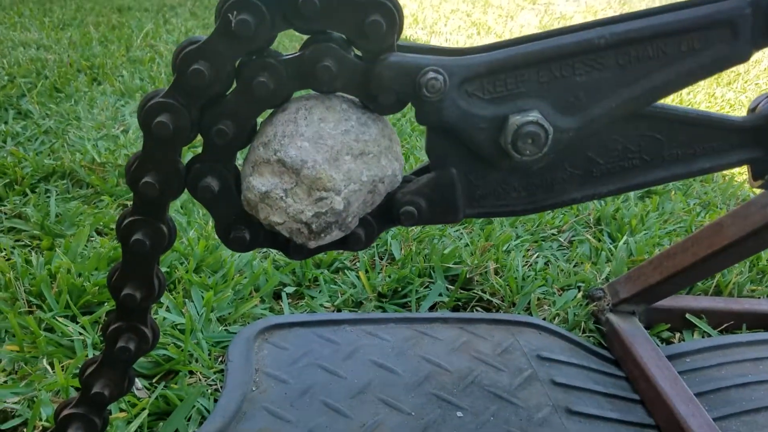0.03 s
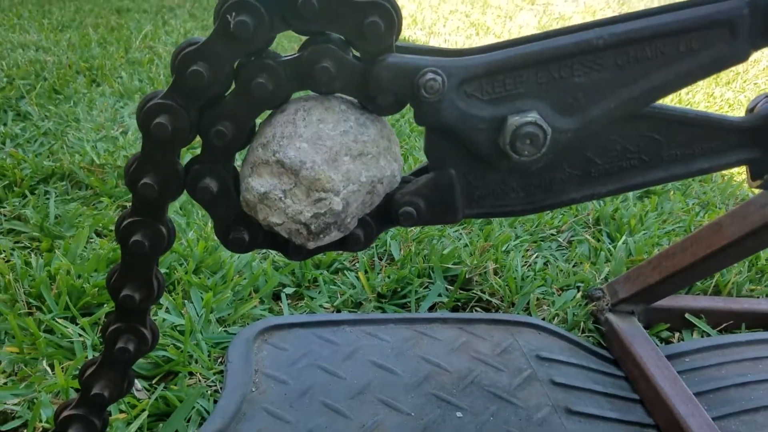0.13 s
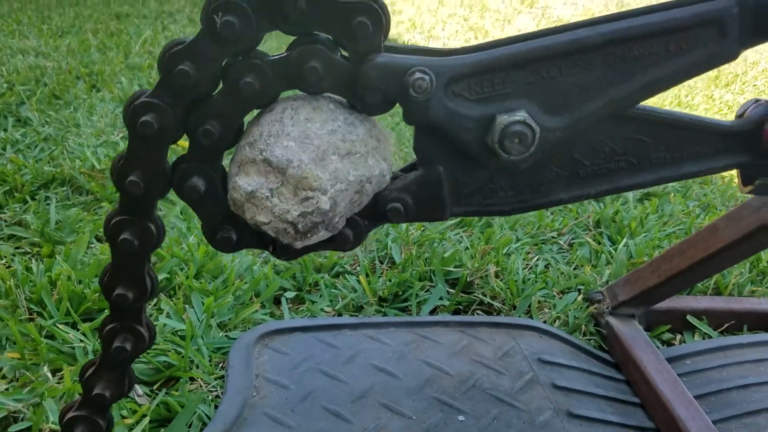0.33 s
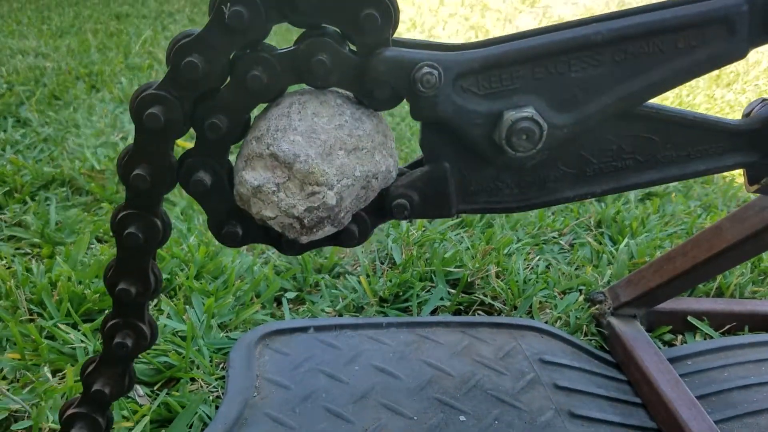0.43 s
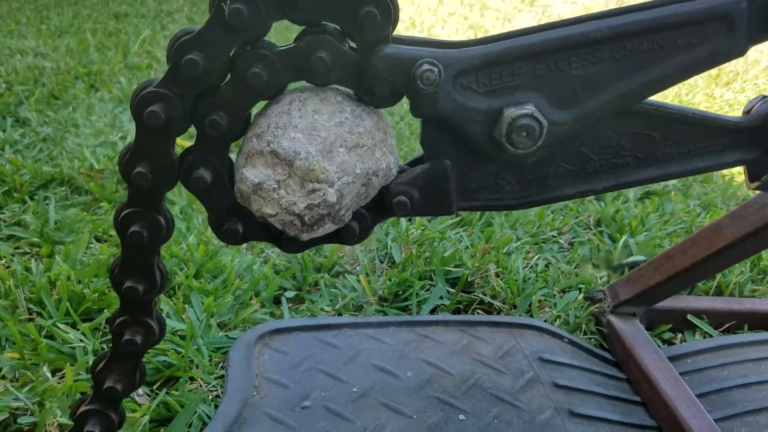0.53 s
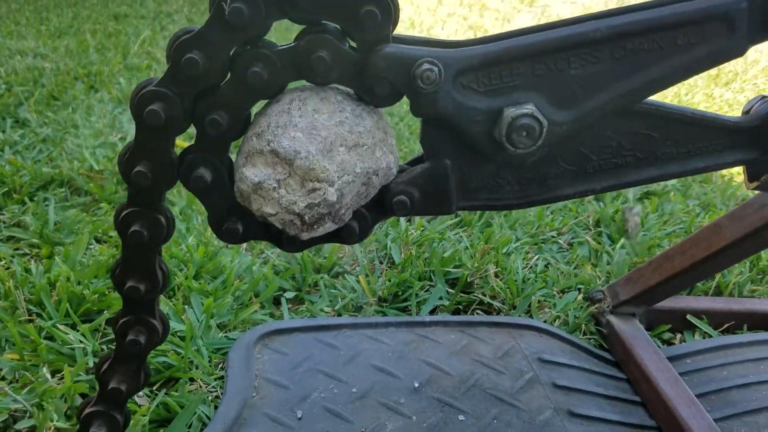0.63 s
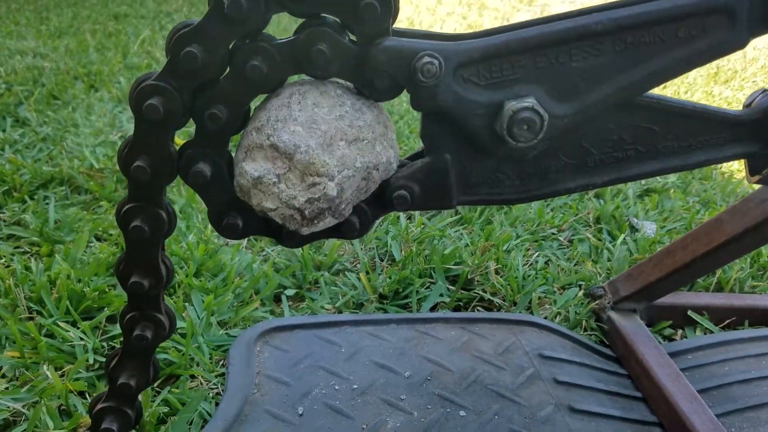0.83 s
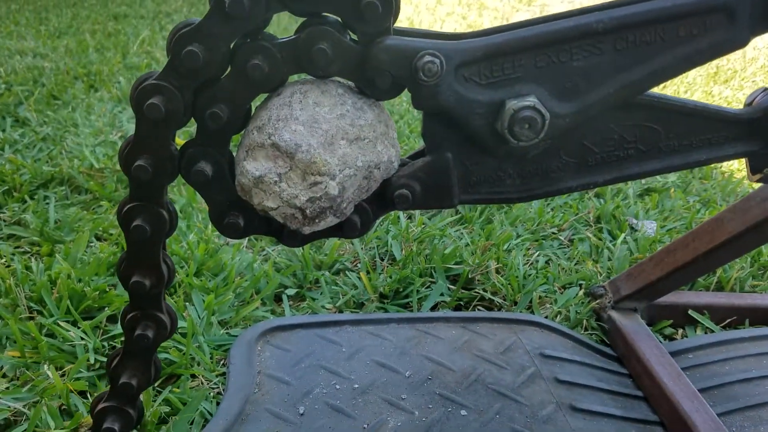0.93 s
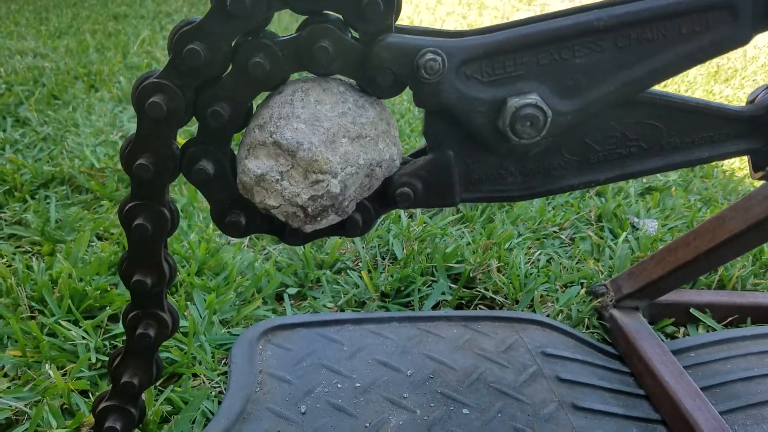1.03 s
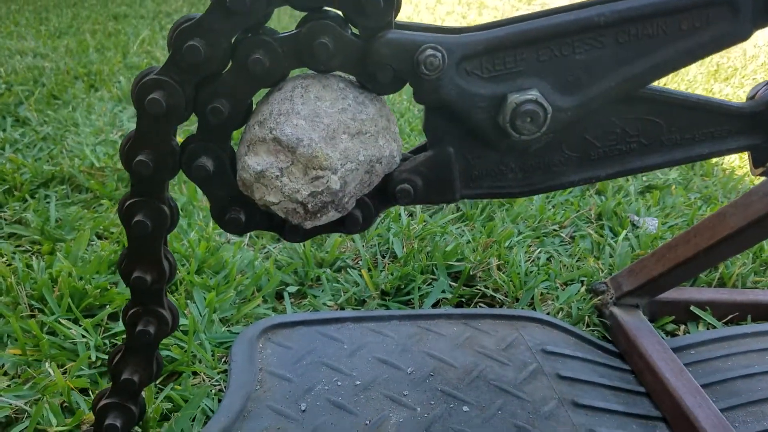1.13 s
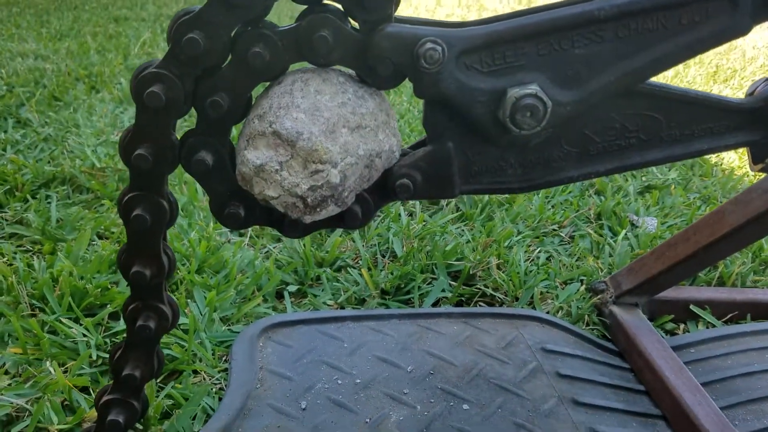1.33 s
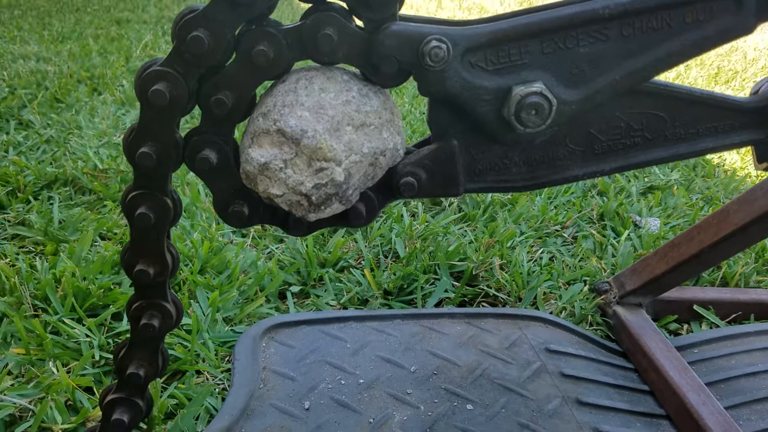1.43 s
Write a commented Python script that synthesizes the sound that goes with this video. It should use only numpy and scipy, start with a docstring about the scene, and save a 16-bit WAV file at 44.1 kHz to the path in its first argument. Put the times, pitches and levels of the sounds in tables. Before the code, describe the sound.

A rock snaps with one sharp crack in a chain cutter, steel links clinking briefly.

```python
"""A geode snaps in a chain cutter on a lawn, close to the microphone.
Over a low outdoor rumble, grit ticks under the links. At 0.22 s the stone gives way in a few
milliseconds; the released steel rings and the chain shivers, then clinks slack.
From about 0.45 s chips skitter and land in the grass. Grit ticks on, loudest at 1.3 s."""
import sys
import numpy as np
from scipy import signal
from scipy.fft import rfft, irfft
from scipy.io import wavfile
from scipy.ndimage import uniform_filter1d

SR = 44100
rng = np.random.default_rng(int(sys.argv[2]) if len(sys.argv) > 2 else 0)


def put_to_file(sound):
    """Save the sound as 16-bit audio at rate SR, in the file named by the first command-line argument."""
    columns = np.atleast_2d(sound).T  # one column per channel
    safe = np.clip(columns, -1, 1)
    whole_steps = np.round(safe * 32767)
    wavfile.write(sys.argv[1], SR, whole_steps.astype(np.int16))


N = 66150
T = np.arange(N) / SR
EDGE_HZ = 15950

# Stereo coherence. Each row: frequency in Hz, left-right correlation.
COHERENCE = [(100, 0.96), (280, .92), (600, 0.3), (1200, 0.034), (3000, 0.074), (16000, 0.059)]
# Knock of a link or chip. Each row: frequency in Hz, relative density in dB, T60 in seconds.
KNOCK_BANDS = [(40, -37, .03), (150, -14, 0.059), (400, -7, 0.045), (860, -5.5, 0.069), (1400, -10, 0.043),
               (2000, -8, 0.086), (3350, -0.5, 0.012), (5300, -15, 0.033), (8140, -25.5, 0.022),
               (16000, -55, 0.017)]


def amp(db):
    """Decibels to gain."""
    return 10 ** (np.asarray(db) / 20)


def unit(x):
    """Scale to rms 1."""
    return x / np.sqrt(np.mean(x ** 2) + 1e-20)


def lookup(rows, hz, column=1):
    """Interpolate a table column over log frequency."""
    columns = np.transpose(rows)
    return np.interp(np.log(hz + 1), np.log(columns[0]), columns[column])


def pan(db):
    """Constant-power gains; db is left minus right."""
    return unit(amp([[db / 2], [-db / 2]]))


def add(mix, start_s, sound):
    """Mix a sound in at start_s."""
    part = mix[:, round(start_s * SR):][:, :sound.shape[1]]
    part += sound[:, :part.shape[1]]


def noise(colour, size=N, tilt_db_oct=0):
    """Coloured stereo noise of rms 1, coherent in the bass."""
    hz = np.fft.rfftfreq(size, 1 / SR)
    right, independent = np.exp(2j * np.pi * rng.random((2, len(hz))))
    coherence = lookup(COHERENCE, hz)
    left = coherence * right + np.sqrt(1 - coherence ** 2) * independent
    gain = amp(lookup(colour, hz) + tilt_db_oct * np.log2(hz + 1)) * (hz < EDGE_HZ) * (hz > 0)
    return unit(irfft(np.array([left, right]) * gain, size))


def grain(depth_db, clump_samples):
    """Random level flutter."""
    flutter = unit(uniform_filter1d(rng.standard_normal(N), clump_samples))
    return unit(amp(depth_db * flutter))


def fade(t60_s, hold_s=0):
    """Exponential decay, easing in while the excitation holds."""
    return np.exp(-np.log(1000) * (np.hypot(T, hold_s) - hold_s) / t60_s)


def mode(hz, t60_s, hold_s=0):
    """Decaying sine; coherence sets the left-right phase."""
    phase_rad = np.arccos(lookup(COHERENCE, hz)) * np.array([[0], [1]])
    return fade(t60_s, hold_s) * np.sin(2 * np.pi * (hz * T + rng.random()) + phase_rad)


def pan_bands(x, source):
    """Pan the stone or the chain band by band."""
    # Each row: frequency in Hz, stone pan in dB, chain pan in dB.
    balance = [(300, -1, -2), (909, -1.5, -1), (1900, -6, -5), (2954, -12, -1.5), (4440, -12, -7.5),
               (8950, -5, -10), (13000, -8.5, -3.5)]
    pan_db = lookup(balance, np.fft.rfftfreq(N, 1 / SR), {"stone": 1, "chain": 2}[source])
    gains = amp(np.outer([.5, -.5], pan_db))
    return irfft(rfft(x) * gains / np.sqrt(np.mean(gains ** 2, 0)), N)


def burst(bands, size=N, tilt_db_oct=0, hold_s=0):
    """Dense ringing: instant onset, one decay per band."""
    log_hz = np.log(np.fft.rfftfreq(size, 1 / SR) + 1)
    spectrum = rfft(noise(bands, size, tilt_db_oct))
    centres_hz, _, decays_s = np.transpose(bands)
    shares = [np.interp(log_hz, np.log(centres_hz), row) for row in np.eye(len(bands))]
    return sum(irfft(spectrum * share, size) * fade(t60_s, hold_s)[:size]
               for share, t60_s in zip(shares, decays_s))


def outdoors():
    """Rumble, distant wash and fine hiss sink after the crack and come back."""
    # Each row: time in seconds, then rumble, wash and hiss levels in dB.
    levels = [(0, -52.5, -54.5, -67), (.2, -47, -56, -61), (.35, -52, -59, -56), (.56, -53.5, -63.5, -68),
              (.8, -54.5, -63, -77), (0.921, -55.5, -60, -76.5), (1.102, -50, -58.5, -69.5),
              (1.28, -49.5, -56.5, -70), (1.5, -50, -57, -64.5)]
    # Three spectra. Each row: frequency in Hz, relative density in dB.
    rumble_colour = [(10, -17.5), (35, -15), (70, -3.5), (115, 1), (170, -5.5), (240, -12), (400, -44.5),
                     (1000, -72.5)]
    wash_colour = [(100, -16.5), (280, 4), (430, -2), (650, 0.5), (1200, -5), (2500, -11), (5000, -24.5),
                   (9000, -29)]
    hiss_colour = [(1500, -22), (4500, 3.5), (7500, -7.5), (10000, -4), (13000, -1), (16000, -3)]
    times_s, *curves_db = np.transpose(levels)
    low, mid, high = (amp(np.interp(T, times_s, db)) for db in curves_db)
    rumble = low * noise(rumble_colour) * grain(depth_db=1, clump_samples=1500)
    hiss = high * noise(hiss_colour) * grain(depth_db=2, clump_samples=90)
    wash = mid * noise(wash_colour)
    return (rumble + wash + hiss) * pan(db=-1.36)


def grass():
    """Crumbs skitter through the grass in soft, grainy showers."""
    # Each row: centre in seconds, spread in seconds, level in dB.
    showers = [(0.474, 0.019, -52), (.52, 0.04, -63.5), (0.638, 0.018, -57), (.68, .04, -69)]
    # Each row: frequency in Hz, relative density in dB.
    rustle_colour = [(200, -1.5), (700, 5), (1500, 3.5), (3000, -2), (5500, -1), (9000, -2.5), (13000, 6.5),
                     (16000, 0.5)]
    level = sum(amp(db) * np.exp(-.5 * ((T - centre_s) / spread_s) ** 2)
                for centre_s, spread_s, db in showers)
    return level * noise(rustle_colour) * grain(depth_db=3.5, clump_samples=70) * pan(db=-4.5)


def grit():
    """Grit cracks between chain and stone in small, bright ticks."""
    # Each row: start in seconds, level in dB, pan in dB.
    ticks = [(0.0642, -48.5, -2), (.162, -53, -4), (0.164, -49, -8), (0.1856, -45, -2.5),
             (0.4427, -50.5, -8), (.715, -65, -3.5), (.902, -65, -4), (.98, -64, -5), (1.053, -55.5, -6.5),
             (1.064, -61, -11.5), (1.219, -55.5, -3), (1.245, -49.5, -7), (1.2991, -35, -5.5),
             (1.333, -53.5, -9), (1.403, -57, -19)]
    # Each row: frequency in Hz, relative density in dB, T60 in seconds.
    tick_bands = [(306.6, -20.5, .02), (1978, -12, 0.02), (3200, -0.5, 0.031), (4300, -2.5, 0.043),
                  (7000, -8, .03), (10500, 1, 0.017), (16000, 0.5, .025)]
    out = np.zeros((2, N))
    for start_s, db, pan_db in ticks:
        tick = burst(tick_bands, size=4096)
        tail = amp(-14.5) * noise(tick_bands, size=8192) * fade(t60_s=.13)[:8192]
        ring = amp(-10) * mode(hz=4320, t60_s=.045)
        for part in (tick, tail, ring):
            add(out, start_s, amp(db) * pan(pan_db) * part)
    return out


def chips():
    """Each chip lands with a dry pulse, a rebound and a faint ring."""
    # Each row: time in seconds, level in dB, pulse width in seconds.
    landings = [(.5234, -30, 0.000044), (0.6487, -40.5, 0.00013)]
    rebound_gain, rebound_s, ring_tau_s = .12, 54e-6, .0052
    out = np.zeros((2, N))
    for at_s, db, width_s in landings:
        push, rebound = (np.exp(-.5 * ((T - s) / width_s) ** 2) for s in (at_s, at_s + rebound_s))
        out += amp(db) * (rebound_gain * rebound - push)
        ring = amp(-13) * burst(KNOCK_BANDS) * np.exp(-T / ring_tau_s)
        knock = amp(-19) * mode(hz=646, t60_s=.046)
        add(out, at_s, amp(db) * (ring + knock))
    return out * pan(db=-2)


def steel(hold_s=0, tilt_db_oct=0):
    """Cutter, chain and stand ring; low modes swell more slowly."""
    # Each row: frequency in Hz, relative level in dB, T60 in seconds, pan in dB.
    steel_modes = [(145, -24, 0.11, -2), (175.7, -27.5, .15, -3), (312.3, -23.5, .12, -2.5),
                   (485, -30, .11, -6), (577, -27, 0.066, 0), (764, -30, .1, 2), (891, -29.5, .06, -5.5),
                   (942, -30.5, .06, -5.5), (1281, -36, .16, 0.5), (1550, -40, 0.15, 0),
                   (1679, -29.5, .19, -3), (2091, -37.5, .17, -10), (2597, -28.5, .145, -14.5),
                   (2686, -35, 0.14, -12.5), (2778, -33, .14, 2.5), (2843, -24.5, .05, -5),
                   (3530, -28, .08, -1.5), (3600, -30.5, 0.1, -1.5), (3725, -34.5, .14, -10.5),
                   (4290, -28, 0.088, -12), (5570, -32.5, 0.32, -11), (8261, -39, .11, -14),
                   (8297, -36, .13, -14), (10880, -36, 0.078, -8)]
    lowest_hz, swell_cycles = steel_modes[0][0], .67
    out = np.zeros((2, N))
    for hz, db, t60_s, pan_db in steel_modes:
        gain = amp(db + tilt_db_oct * np.log2(hz / lowest_hz)) * pan(pan_db)
        swell = 1 - np.exp(-T * hz / swell_cycles)
        out += gain * swell * mode(hz, t60_s, hold_s)
    return out


def links():
    """Slack links knock together, each at its own pitch, and stir the tool's modes."""
    # Each row: start in seconds, level in dB, pan in dB, tilt in dB per octave, ring in Hz.
    clinks = [(0.3181, -28, 0.5, 2, 3270), (0.3366, -36, -7, 3.5, 4450), (0.3666, -37.5, -2.5, 1, 1116),
              (0.3981, -44.5, -6, 3.5, 4900), (.4105, -53, -2, 8, 1230)]
    # Modes of every link. Each row: frequency in Hz, relative level in dB, T60 in seconds.
    link_modes = [(674, -21, .1), (919, -13.5, 0.084), (1247, -10.5, 0.051), (1830, -11, 0.064),
                  (2200, -12.5, .05)]
    out = np.zeros((2, N))
    tool_ring = amp(9) * steel()
    for start_s, db, pan_db, tilt_db_oct, ring_hz in clinks:
        knock = burst(KNOCK_BANDS, tilt_db_oct=tilt_db_oct)
        knock += amp(-5) * mode(ring_hz, t60_s=.03)
        knock += sum(amp(mode_db) * mode(hz, t60_s) for hz, mode_db, t60_s in link_modes)
        add(out, start_s, amp(db) * (pan(pan_db) * knock + tool_ring))
    return out


def cutter():
    """Freed of its load, the chain chatters and briefly sustains the steel's ring; the stand jolts."""
    # Each row: frequency in Hz, relative density in dB, T60 in seconds.
    shiver_bands = [(30, -30.5, 0.11), (130, -6, 0.2), (260, -2, 0.062), (905, -3, 0.08), (1420, -11, 0.25),
                    (2060, -2.5, 0.18), (3280, 2, 0.17), (4650, -7.5, .16), (6900, -10.5, 0.11),
                    (9200, -7, 0.18), (11500, -8, 0.22), (16000, -14, .18)]
    release_s, rise_s, chatter_s = .2265, .001, .022
    jolt_s, jolt_width_s = .2405, .0016
    shiver = burst(shiver_bands, hold_s=chatter_s) * grain(depth_db=3, clump_samples=60)
    shiver *= np.minimum(T / rise_s, 1)
    ring = steel(hold_s=chatter_s, tilt_db_oct=-.08)
    out = np.zeros((2, N))
    add(out, release_s, amp(-22) * pan_bands(shiver, "chain") + amp(1) * ring)
    u = (T - jolt_s) / jolt_width_s
    jolt = (u ** 2 - 1) * np.exp(-u ** 2 / 2)
    return out + amp(-26) * jolt


def fracture():
    """The stone splits in quick, gritty steps, right of centre."""
    # Each row: start in seconds, level in dB.
    steps = [(0.2236, -13.5), (0.2246, -10.5), (0.2262, -10.5)]
    # Each row: frequency in Hz, relative density in dB, T60 in seconds.
    snap_bands = [(40.4, -37, .02), (150, -17.5, 0.022), (353, 0, 0.039), (970, -3.5, 0.081),
                  (1500, -15, 0.09), (2300, -7, 0.052), (3130, -4.5, 0.06), (5230, -1, .022),
                  (7910, -10.5, 0.007), (11700, -6, 0.015), (16000, -11.5, .018)]
    low_cut_hz = 212
    snaps = np.zeros((2, N))
    for start_s, db in steps:
        add(snaps, start_s, amp(db) * burst(snap_bands, size=16384))
    gritty = snaps * grain(depth_db=2, clump_samples=8)
    highpass = signal.butter(2, low_cut_hz, "high", fs=SR, output="sos")
    return pan_bands(signal.sosfilt(highpass, gritty), "stone")


def scene():
    """Stereo sum of all sources."""
    return fracture() + cutter() + links() + chips() + grit() + grass() + outdoors()


def record(dry):
    """Soft clip, then band limit."""
    ceiling = .95
    clipped = dry / (1 + (dry / ceiling) ** 6) ** (1 / 6)
    lowpass = signal.firwin(255, EDGE_HZ, window=("kaiser", 9), fs=SR)
    return signal.oaconvolve(clipped, lowpass[None], "same")


dry = scene()
out = record(dry)
put_to_file(out)
```